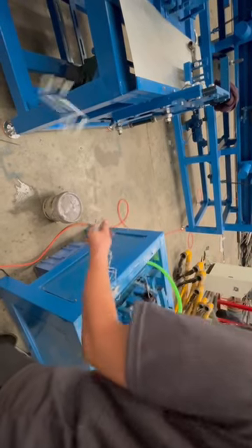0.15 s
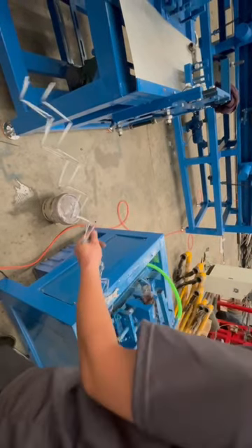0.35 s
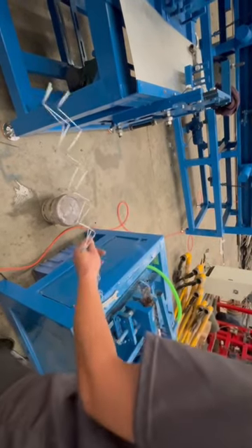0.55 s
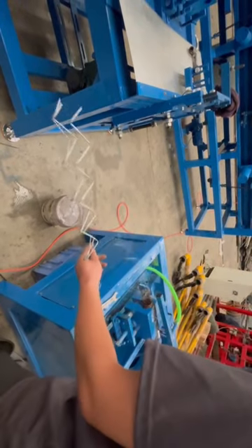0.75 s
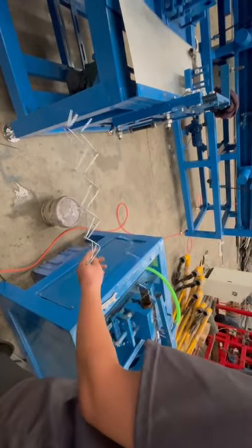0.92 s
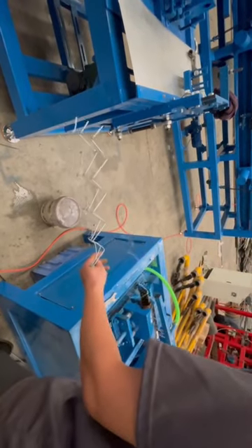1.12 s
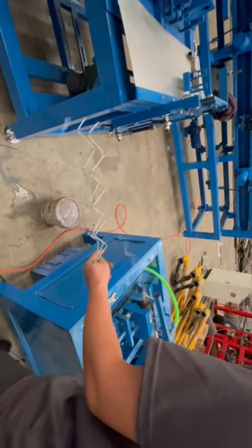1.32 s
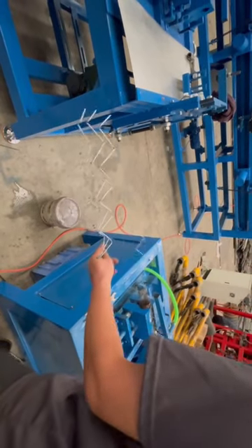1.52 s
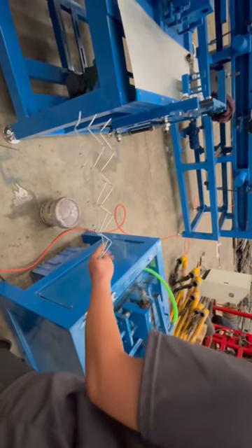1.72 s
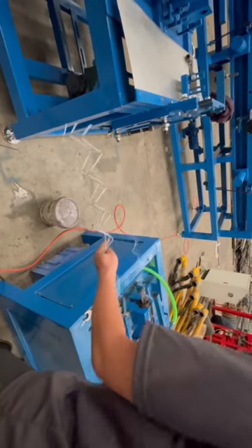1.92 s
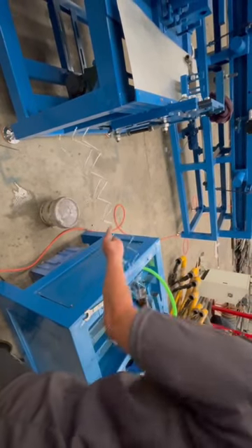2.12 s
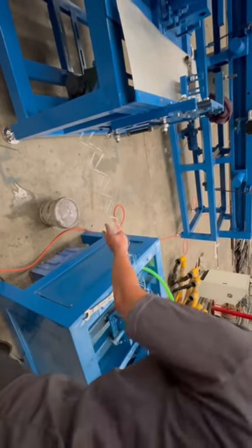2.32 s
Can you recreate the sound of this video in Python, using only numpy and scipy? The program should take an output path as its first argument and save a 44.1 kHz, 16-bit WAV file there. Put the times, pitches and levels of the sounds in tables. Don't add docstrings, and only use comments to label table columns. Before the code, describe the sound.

Pedal-started wire-weaving machine rattles in two short bursts with sharp metallic slaps in a workshop

```python
import sys
import numpy as np
from scipy import signal
from scipy.fft import rfft, irfft
from scipy.io import wavfile
from scipy.ndimage import uniform_filter1d

SR = 44100
rng = np.random.default_rng(int(sys.argv[2]) if len(sys.argv) > 2 else 0)


def persist_wave(psi):
    counts = np.round(np.clip(psi, -1, 1) * 32767).astype(np.int16)
    wavfile.write(sys.argv[1], SR, np.atleast_2d(counts).T)


def how_loud(loudness_db):
    steps = np.asarray(loudness_db, float) / 20
    return 10 ** steps


N = 103635

# (frequency [Hz], width [Hz], level [dB])
FRAME_MODES = [(502.8, 39.3, -8.5), (614, 50, -6), (723.6, 29.5, 1), (864, 76, -1), (1011, 120, 2),
               (1083, 63, 5.5), (1162.5, 38.4, 3), (1295, 102, -4), (1493, 31.6, 1), (1646, 135, -2),
               (2016, 274, -8), (2272, 78, 2), (2912, 60, -4.5), (3700, 77, -6.5)]
# (frequency [Hz], width [Hz], level [dB])
WIRE_MODES = [(2870, 320, -12), (4640, 1500, -1.5), (5670, 480, 3), (6140, 1120, -4), (7240, 210, -2.5),
              (9070, 1620, -2.5), (9910, 350, 2.5), (11930, 2700, -0.5), (11940, 540, -7),
              (12700, 1300, -10.5)]
FRAME_WANDER_DB, WIRE_WANDER_DB = 3.5, 1.6


def unit(x):
    return x / np.sqrt(np.mean(x ** 2))


def walk(rate_per_s):
    k = int(SR / rate_per_s)
    return unit(uniform_filter1d(uniform_filter1d(rng.standard_normal(N), k), k))


def coloured(points):
    hz, db = np.array(points).T
    f_hz = np.fft.rfftfreq(N, 1 / SR) + 1
    gain = how_loud(np.interp(np.log(f_hz), np.log(hz), db))
    return unit(irfft(rfft(rng.standard_normal(N)) * gain, N))


def ring(x, hz, width_hz):
    return signal.lfilter(*signal.iirpeak(hz, hz / width_hz, SR), x)


def body(x, modes, wander_db=0.0):
    out = np.zeros(N)
    for k, (hz, width_hz, db) in enumerate(modes):
        feed = x * how_loud(wander_db * walk(58))
        out += (-1) ** k * how_loud(db) * ring(feed, hz, width_hz)
    return out


def impacts(rate_per_s, scatter_db):
    hit = rng.random(N) < rate_per_s / SR
    size = np.minimum(rng.exponential(size=N), 3.2)
    return unit(hit * how_loud(scatter_db * size) * np.sign(rng.standard_normal(N)))


def shop():
    # (frequency [Hz], density [dB per Hz])
    shop_spectrum = [(15, -40), (25, -11), (74, -9), (134, -5.5), (358, -7.5), (409, -8), (443, -11),
                     (627, -5.5), (14500, -45)]
    return how_loud(-39 + 2.4 * walk(9)) * coloured(shop_spectrum)


def room(x, t):
    # (frequency [Hz], t60 [s], level [dB])
    room_decay = [(153, 2.5, -1.5), (495, 2, 4.5), (1250, 2.06, -1), (3170, 2.16, -1), (7240, 3, -0.5),
                  (12700, 0.68, -0.5)]
    wet_db, delay_s = -7.5, 0.0063
    tail = np.zeros(N)
    for hz, t60_s, db in room_decay:
        band = unit(ring(ring(rng.standard_normal(N), hz, hz), hz, hz))
        tail += band * how_loud(db - 60 * t / t60_s) * np.sqrt(hz / t60_s)
    tail *= np.clip(t / delay_s - 1, 0, 1)
    tail /= np.sqrt(np.sum(tail ** 2))
    return how_loud(wet_db) * signal.fftconvolve(x, tail)[:N]


def shudder(t):
    centre_s, length_s, level_db = 1.857, 0.079, -33.5
    hz, width_hz = 211, 166
    shape = np.exp(-0.5 * ((t - centre_s) / length_s) ** 2)
    shake = unit(ring(ring(rng.standard_normal(N), hz, width_hz), hz, width_hz))
    return how_loud(level_db) * shape * shake


def latch(t):
    # (time [s], level [dB], hiss [dB re level], swell [s])
    clicks = [
        (1.124, -16, -8, 0.0054),
        (1.960, -21.5, -1.5, 0.0044),
        (1.971, -20, -10, 0.005),
    ]
    # (frequency [Hz], width [Hz], level [dB])
    latch_modes = [(1490, 80, -7.5), (2200, 99, 0.5), (2590, 94, -20), (3080, 81, -18.5), (3190, 230, -9),
                   (4000, 320, -13), (9650, 85, -13)]
    tone = np.zeros(N)
    for hz, width_hz, db in latch_modes:
        jitter_rad = width_hz / 150 * walk(3 * width_hz)
        tone += how_loud(db) * np.sin(2 * np.pi * hz * t + jitter_rad)
    hiss = unit(body(rng.standard_normal(N), WIRE_MODES))
    out = np.zeros(N)
    for start_s, db, hiss_db, swell_s in clicks:
        age = np.maximum(t - start_s, 0) / swell_s
        swell = 4.44 * age ** 2 * np.exp(-2 * age)
        out += how_loud(db) * swell * (tone + how_loud(hiss_db) * hiss)
    return out


def slaps(t):
    # (time [s], bright peak [dB], plate [dB re peak], frame knock [dB re peak], t60 [s])
    slap_events = [(0.167, -33, -18, 2.5, 0.079), (0.2144, -45, -7, 5, 0.099),
                   (0.2433, -37.5, -1, 15, 0.085), (0.3436, -28.5, 1, -23, 0.16),
                   (0.3624, -25, -12, 8.5, 0.053), (0.385, -26, 7, 12, 0.064), (0.4197, -23, -17, 8, 0.084),
                   (0.4444, -31, -2, 4, 0.042), (0.483, -13.5, -25, 9, 0.037), (0.5243, -26, 5, 5, 0.098),
                   (0.5491, -20, -0.5, -22, 0.12), (0.618, -14, 2, 3, 0.063), (0.6771, -20, -17, 10, 0.076),
                   (0.6914, -32, -2, 13, 0.084), (0.7517, -14, -4.5, 12.5, 0.063),
                   (1.211, -34.5, -8, -9, 0.07), (1.361, -28, -21, 0, 0.13), (1.443, -26.5, -12, 14, 0.088),
                   (1.515, -16.5, -9, 4, 0.11), (1.6501, -16.5, -23, 4.5, 0.08),
                   (1.714, -23, -3, 17.5, 0.1), (1.7951, -17, 8, 11, 0.023), (1.808, -29.5, 15, 21.5, 0.12),
                   (2.302, -31.5, -4.5, -15, 0.078)]
    level_db, rise_s = -8, 0.00084
    crack_db, crack_s = -4, 0.0014
    bright, plate, knock = np.zeros((3, N))
    for start_s, db, plate_db, knock_db, t60_s in slap_events:
        age_s = np.maximum(t - start_s, 0)
        shape = how_loud(db + level_db - 60 * age_s / t60_s) * (1 - np.exp(-age_s / rise_s))
        bright += shape * (1 + how_loud(crack_db) * np.exp(-age_s / crack_s))
        plate += shape * how_loud(plate_db)
        knock += shape * how_loud(knock_db - 1)
    chatter = bright * impacts(5000, 2.9)
    wire = body(chatter, WIRE_MODES, WIRE_WANDER_DB)
    wire += how_loud(-4.5) * ring(chatter, 8000, 9700)
    plate_ring = ring(plate * rng.standard_normal(N), 2195, 136)
    frame = body(knock * rng.standard_normal(N), FRAME_MODES, FRAME_WANDER_DB)
    return 3.6 * wire + 17.3 * plate_ring + 3.95 * frame


def drive(t):
    # (time [s], level [dB], load on the upper frame modes [dB])
    bursts = [
        [(0.2, -47, 21), (0.236, -24.5, -8.5), (0.288, -20.5, 4), (0.332, -29, -19), (0.35, -18.5, -21),
         (0.382, -24.5, 3), (0.578, -19.5, 3), (0.868, -22, -4), (0.99, -41.5, -24)],
        [(1.24, -37.5, 6), (1.398, -18, -1), (1.504, -22, 4.5), (1.524, -19, 1.5), (1.57, -21.5, 4.5),
         (1.58, -20.5, 3), (1.84, -17, -1), (1.926, -32, -5), (1.95, -30, 10)],
    ]
    # (frequency [Hz], density [dB per Hz])
    whir_spectrum = [(47, -57), (80, -24), (876, 1.5), (1070, -6), (1380, 0.5), (2280, -7), (3300, -15.5),
                     (9800, -27), (14500, -43)]
    frame_db, whir_db, sizzle_db = -2.5, -5, -18.5
    ramp_s, tooth_ms, upper_hz = 0.024, 0.13, 1850
    level, load = np.zeros(N), np.ones(N)
    for burst in bursts:
        s, db, load_db = np.array(burst).T
        on = np.clip(np.minimum(t - s[0], s[-1] - t) / ramp_s, 0, 1)
        level += on * how_loud(np.interp(t, s, db))
        load = np.where(on > 0, how_loud(np.interp(t, s, load_db)), load)

    fall = np.exp(-1000 / (tooth_ms * SR))
    teeth = signal.lfilter([1], [1, -fall], impacts(700, 3))
    teeth *= how_loud(2 * walk(11.7))
    low_modes = [m for m in FRAME_MODES if m[0] < upper_hz]
    high_modes = [m for m in FRAME_MODES if m[0] >= upper_hz]
    low = body(teeth, low_modes, FRAME_WANDER_DB)
    high = body(teeth * load, high_modes, FRAME_WANDER_DB)
    frame = (low + high) / np.std(low)

    sizzle = unit(body(impacts(1700, 2.6), WIRE_MODES, WIRE_WANDER_DB)) * how_loud(2 * walk(27))
    mix = how_loud(frame_db) * frame + how_loud(whir_db) * coloured(whir_spectrum)
    return level * (mix + how_loud(sizzle_db) * sizzle * load)


def scene():
    t = np.arange(N) / SR
    machine = drive(t) + slaps(t) + latch(t) + shudder(t)
    return (machine + room(machine, t) + shop())[None]


def starve(x, size, count, shift_db):
    from_hz, floor_db, luck_db, tilt_db_per_khz = 4200, -5.5, 1.6, 0.2
    f_hz, _, z = signal.stft(x, SR, nperseg=size)
    rows = len(f_hz) // count * count
    band_hz = f_hz[:rows:count, None]
    power = (abs(z[:rows]) ** 2).reshape(-1, count, z.shape[1]).mean(axis=1)
    power_db = 10 * np.log10(power + 1e-18)
    around_db = uniform_filter1d(uniform_filter1d(power_db, size=7, axis=0), size=3, axis=1)
    luck = uniform_filter1d(rng.standard_normal(power.shape), size=3, axis=1) * np.sqrt(3)
    limit_db = floor_db + shift_db + tilt_db_per_khz * (band_hz / 1000 - 9)
    weak = (power_db - around_db + luck_db * luck < limit_db) & (band_hz > from_hz)
    keep = np.ones(z.shape)
    keep[:rows] = 1 - np.repeat(weak, count, axis=0)
    return signal.istft(z * keep, SR, nperseg=size)[1][:N]


def roll_off(x):
    return signal.sosfilt(signal.butter(12, 14860, fs=SR, output="sos"), x)


def record(dry):
    low_pass = signal.ellip(10, 0.2, 80, 14050, fs=SR, output="sos")
    x = signal.sosfilt(low_pass, np.tanh(dry[0]))
    x = starve(x, size=256, count=5, shift_db=-1.5)
    x = starve(x, size=2048, count=10, shift_db=1.8)
    return roll_off(x[None])


dry = scene()
out = record(dry)
persist_wave(out)
```